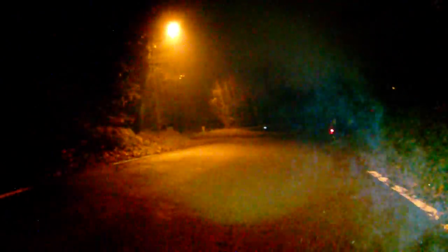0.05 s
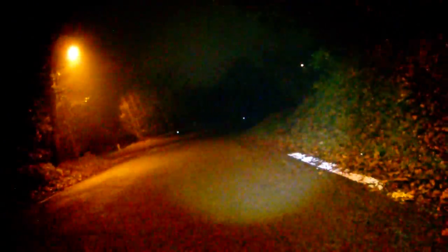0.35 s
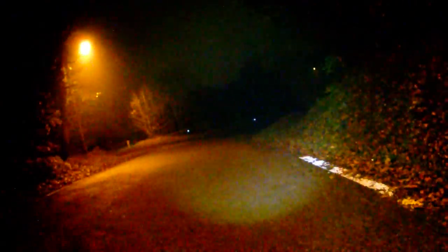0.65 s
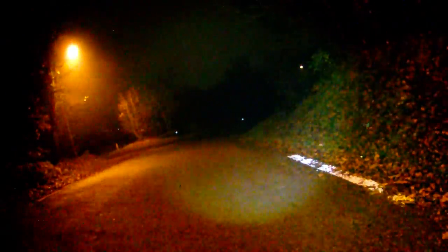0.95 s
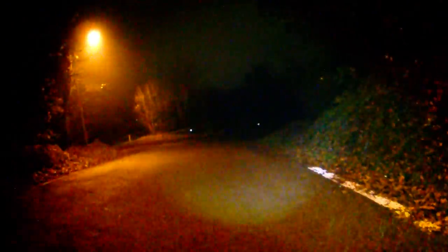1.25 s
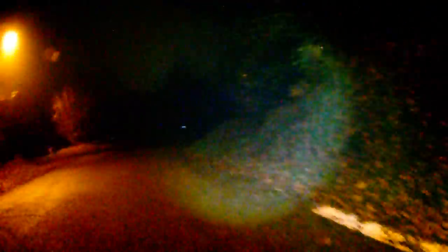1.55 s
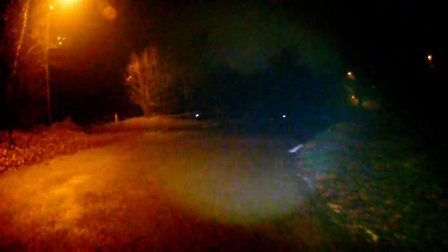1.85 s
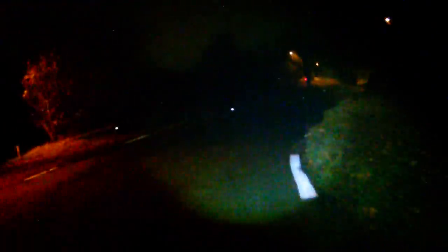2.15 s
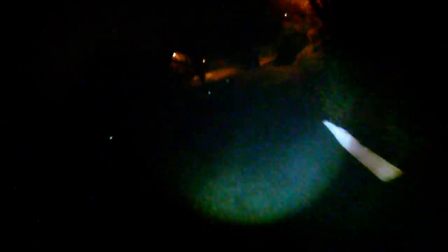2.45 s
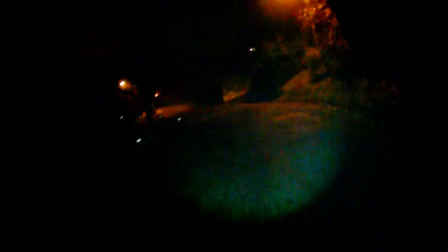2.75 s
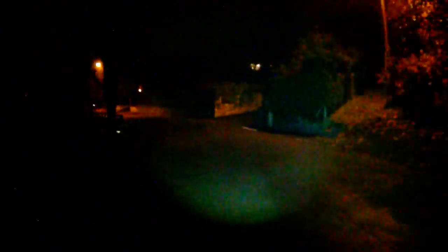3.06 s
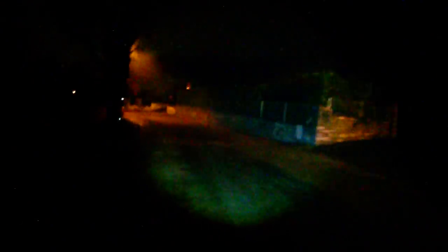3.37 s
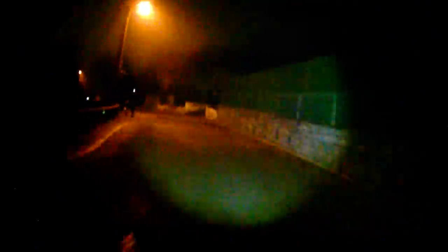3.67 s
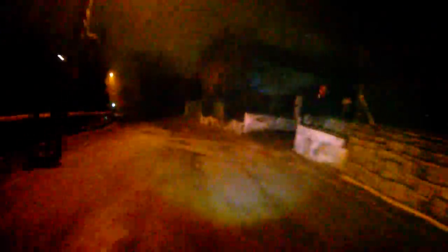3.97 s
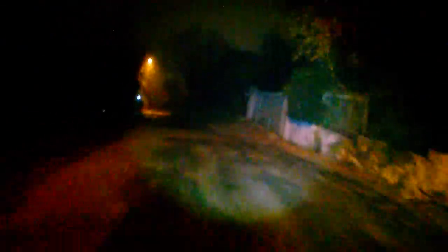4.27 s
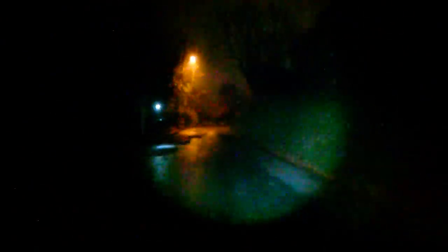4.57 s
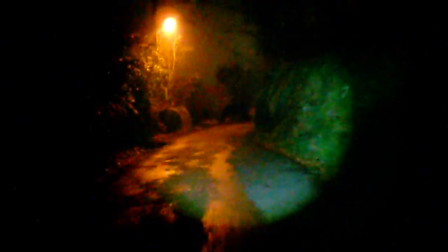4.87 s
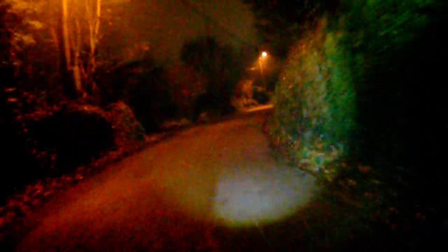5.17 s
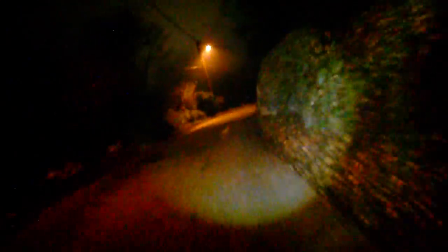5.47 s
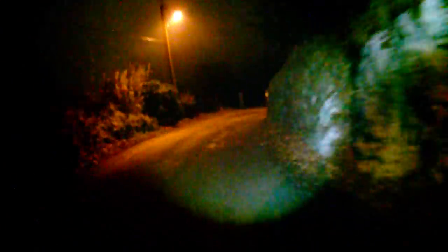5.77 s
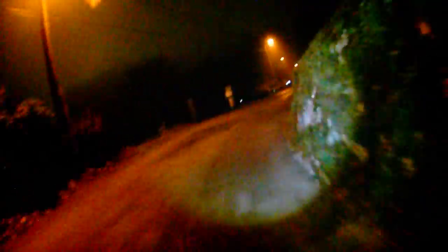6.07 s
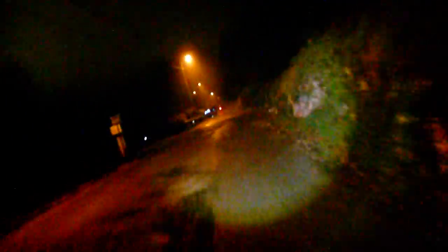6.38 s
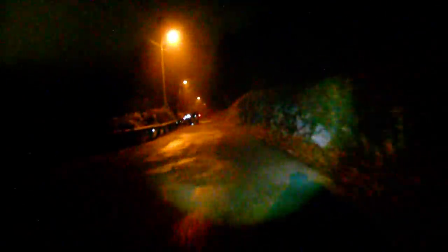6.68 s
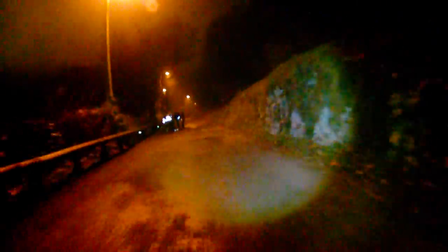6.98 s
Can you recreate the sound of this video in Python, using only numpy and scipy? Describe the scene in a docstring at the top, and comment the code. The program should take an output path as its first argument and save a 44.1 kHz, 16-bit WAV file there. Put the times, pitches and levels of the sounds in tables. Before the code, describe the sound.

On a quiet road, a bicycle's pedals and fittings click and creak, and a shoe snaps into its pedal. The tyres begin to hiss and hum, spitting grit as speed grows, and bumps rattle the loose metal parts. Just past halfway the brake gives two short, loud, high squeals, then rubs faintly as the bike rolls on with a few knocks. The microphone rides on the bike and overloads slightly.

```python
"""On a road at night, a bicycle sets off, heard from a small camera riding with it.
Pedals and fittings click and creak, and a shoe snaps into its pedal. Then the tyres hiss, hum
and spit grit as speed grows, and bumps rattle the loose parts. A brake pad sticks and slips,
squealing twice and overloading the microphone, then rubs on faintly."""
import sys
import numpy as np
from scipy import signal
from scipy.fft import rfft, irfft, next_fast_len
from scipy.io import wavfile
from scipy.ndimage import map_coordinates

SR = 44100
rng = np.random.default_rng(int(sys.argv[2]) if len(sys.argv) > 2 else 0)


def put_to_file(sound):
    """Save the sound as 16-bit audio at rate SR, in the file named by the first command-line argument."""
    columns = np.atleast_2d(sound).T  # one column per channel
    safe = np.clip(columns, -1, 1)
    whole_steps = np.round(safe * 32767)
    wavfile.write(sys.argv[1], SR, whole_steps.astype(np.int16))


N = 310023
T = np.arange(N) / SR
SETS_OFF_S, SET_OFF_TAKES_S = 1.245, 0.17
TOP_HZ = 16000
# the tone of the bike's metal when tapped: pitch_hz, level_db
METAL_TONE = [(100, -25), (750, -3), (1050, 0), (1600, -3.5), (2000, -3.5), (2750, -7), (3300, -2),
              (3900, -1), (4700, 1), (5900, -11), (8000, -1.5), (10700, 6.5), (12500, -13), (16000, -38)]


def undb(db):
    """Turn decibels into a number to multiply by."""
    return 10 ** (np.asarray(db) / 20)


def unit(x):
    """Scale a signal to an average (rms) size of 1."""
    return x / np.sqrt(np.mean(x ** 2) + 1e-18)


def curve(table):
    """Join (time_s, value) points with straight lines."""
    times, values = np.transpose(table)
    return np.interp(T, times, values)


def ramp(start_s, length_s):
    """Rise steadily from 0 to 1, then stay there."""
    return np.clip((T - start_s) / length_s, 0, 1)


def swell(middle_s, length_s):
    """Rise smoothly to 1 and fall back to 0."""
    return np.sin(np.pi * ramp(middle_s - length_s / 2, length_s))


def fade(t, decay_s):
    """Die away, dropping 60 dB in decay_s."""
    return np.exp(-np.log(1000) * t / decay_s)


def add(out, start_s, x):
    """Mix x into out at start_s."""
    i = max(int(start_s * SR), 0)
    out[i:i + len(x)] += x[:max(N - i, 0)]


def colour(x, tone, centre_hz=1000, focus_db=0):
    """Filter by (pitch_hz, level_db) points, less focus_db per octave from the centre, for 2 octaves."""
    size = 2 * next_fast_len(len(x) // 2 + 1024)
    octave = np.log2(np.maximum(np.arange(size // 2 + 1) * SR / size, 1))
    hz, db = np.transpose(tone)
    away = np.minimum(np.abs(octave - np.log2(centre_hz)), 2)
    gain = undb(np.interp(octave, np.log2(hz), db) - focus_db * away)
    # fold the filter in time so that it rings only after a hit, never before
    cepstrum = irfft(np.log(gain))
    cepstrum[1:size // 2] *= 2
    cepstrum[size // 2 + 1:] = 0
    return irfft(rfft(x, size) * np.exp(rfft(cepstrum)))[:len(x)]


def noise(tone, centre_hz=1000, focus_db=0):
    """Steady noise with the given tone."""
    return unit(colour(rng.standard_normal(N), tone, centre_hz, focus_db))


def wobble(rate):
    """A smooth random wobble that changes about rate times a second."""
    knots = rng.standard_normal(N // 8)[:int(N / SR * rate) + 4]
    return unit(map_coordinates(knots, [T * rate], order=3, mode="nearest"))


def whine(hz, width_hz):
    """A narrow band of noise around a pitch that may move."""
    phase = 2 * np.pi * np.cumsum(hz) / SR
    return unit(wobble(width_hz) * np.cos(phase) + wobble(width_hz) * np.sin(phase))


def grains(rate, spread_db):
    """Tiny hits of very uneven size, about rate a second, each smeared over a moment."""
    hit = rng.random(N) < rate / SR
    size = undb(spread_db * np.minimum(rng.exponential(size=N), 3.5))
    smear = signal.lfilter([1], [1, -np.exp(-1 / (SR * 0.00037))], hit * size ** 2)
    return unit(np.sqrt(smear) * rng.standard_normal(N))


def still_air():
    """A faint hiss that eases before the bike sets off."""
    # how loud the hiss is: time_s, level_db
    loudness = [(.2, -47), (.6, -50), (.8, -58), (1.3, -55)]
    # the tone of still air: pitch_hz, level_db
    air_tone = [(30, -25), (120, -26), (250, -12), (400, -29), (700, -26), (1040, 2.5), (1500, -19),
                (1960, -4), (2750, -10), (4600, 2), (5900, -17), (11000, -3.5), (13000, -39), (16000, -81)]
    return undb(curve(loudness)) * noise(air_tone)


def chatter(hiss_db, rough_db):
    """Small loose parts chatter as the bike rolls, most where the road is rough."""
    ticks = unit(colour(grains(rate=80, spread_db=3.2), METAL_TONE, centre_hz=4700, focus_db=10))
    return undb(hiss_db + rough_db - 10) * ramp(SETS_OFF_S, SET_OFF_TAKES_S) * ticks


def creaks():
    """Parts under load slip in uneven steps, from ticking to a thin squeak; faint ticks fill the gaps."""
    # runs of slips: start_s, length_s, first_rate_hz, last_rate_hz, centre_hz, relative_db
    slip_runs = [(0.029, 0.015, 193, 294, 6500, -25.5), (0.046, 0.02, 427, 490, 4700, -18),
                 (0.318, 0.03, 3540, 4200, 6800, -22), (0.333, 0.068, 3150, 3900, 6200, -26),
                 (0.379, 0.034, 755, 1170, 2820, -16.5), (0.374, 0.056, 260, 180, 6560, -26),
                 (0.482, 0.0163, 319, 275, 5140, -19), (0.489, 0.034, 700, 890, 3420, -31),
                 (0.559, 0.057, 262, 230, 6960, -32), (0.992, 0.039, 1055, 940, 3300, -35),
                 (1.11, 0.031, 3030, 3720, 5900, -18.5)]
    out = np.zeros(N)
    for start_s, length_s, first_hz, last_hz, centre_hz, db in slip_runs:
        count = int(length_s * SR)
        rate = np.linspace(first_hz, last_hz, count) * (1 + .025 * wobble(300)[:count])
        late_s = 1e-5 * wobble(2500)[:count]  # each slip comes a little early or late
        phase = 2 * np.pi * (np.cumsum(rate) / SR - rate * late_s)
        slips = unit(sum(np.cos(k * phase) for k in range(1, int(TOP_HZ / rate.max()) + 1)))
        scuff = undb(-18) * rng.standard_normal(count)
        pressure = (.15 + np.hanning(count)) * undb(3 * wobble(300)[:count])
        rubbing = np.pad((slips + scuff) * pressure, (0, count))
        rasp = colour(rubbing, METAL_TONE, centre_hz, focus_db=30.5)
        add(out, start_s, undb(db - 11) * unit(rasp))
    ticks = unit(colour(grains(rate=190, spread_db=3.8), METAL_TONE, centre_hz=4300, focus_db=10))
    return out + undb(-47) * ticks


def tyre_hiss(hiss_db, pace_db, rough_db):
    """The tread hisses on the asphalt and flings a bright spray of grit."""
    # the tone of the tread on asphalt: pitch_hz, level_db
    hiss_tone = [(1180, -43), (2000, -6), (2340, -6), (2890, 2), (3240, 1.5), (3690, -1.5), (4140, 6),
                 (4580, 1), (5680, -8.5), (7000, -12), (9100, -31), (15400, -120)]
    # the tone of flying grit: pitch_hz, level_db
    spray_tone = [(4000, -20.5), (5600, 0), (6500, 5.5), (7500, 5.5), (8500, 3.5), (10700, 8), (11400, 1.5),
                  (12500, -11.5), (14000, -21), (15000, -65)]
    road_db = 1.18 * wobble(45) - .3  # the surface changes under the wheel
    grit = grains(rate=140, spread_db=3.5)
    hiss = undb(0.75) * noise(hiss_tone) + undb(-7.5) * unit(colour(grit, hiss_tone))
    spray_db = -26 + pace_db + rough_db + 0.37 * wobble(60)
    spray = undb(-1.5) * noise(spray_tone) + undb(-5.5) * unit(colour(grit, spray_tone))
    return undb(hiss_db + road_db) * hiss + undb(spray_db + road_db) * spray


def wheel_roar(hiss_db, pace_db):
    """Rolling makes the tyres roar and the wheels ring."""
    # the tone of the tyres' roar: pitch_hz, level_db
    roar_tone = [(200, -35), (450, -19.5), (680, -12), (850, 1), (1020, 6.5), (1300, 2.5), (1550, 3.5),
                 (3000, -40)]
    # the ring of a rolling wheel: pitch_hz, level_db
    rim_tone = [(1400, -30.5), (1630, -2), (1740, 11.5), (1840, 6), (1950, 10.5), (2100, 1), (2500, -36.5)]
    thin_db = np.minimum(hiss_db + 37.5, 0)  # at a crawl both fall away faster
    damped_db = -2 * ramp(4.1, 0.14)  # the brake pad damps the ring
    roar = undb(-33 + 0.47 * pace_db + thin_db + 0.13 * wobble(25)) * noise(roar_tone)
    rim = undb(-31 + 0.67 * pace_db + 2 * thin_db + damped_db + 0.39 * wobble(17)) * noise(rim_tone)
    return roar + rim


def frame_hum(hiss_db, pace_db):
    """The tyres hum through the frame, higher when the bike is slow."""
    # the tone of the humming frame: pitch_hz, level_db
    hum_tone = [(25, -26), (60, -21), (115, 4), (170, 0.5), (260, -7.5), (450, -8.5), (900, -38)]
    slow = np.clip((-24.5 - hiss_db) / 8, 0, 1)
    slow_hum = noise(hum_tone, centre_hz=238, focus_db=11.5)
    hum_db = -51.5 + 0.22 * pace_db + 0.53 * wobble(11)
    return undb(hum_db) * (np.sqrt(1 - slow) * noise(hum_tone) + np.sqrt(slow) * slow_hum)


def tyres(hiss_db, rough_db):
    """The rolling tyres hiss, roar and hum, and their tread whines higher as speed grows."""
    pace_db = hiss_db + 20  # 0 at cruising speed
    rolling = tyre_hiss(hiss_db, pace_db, rough_db)
    rolling += wheel_roar(hiss_db, pace_db) + frame_hum(hiss_db, pace_db)
    tread_db = np.minimum(-43 + 1.35 * pace_db, -43.5)
    tread = undb(tread_db) * whine(hz=900 * 2 ** (pace_db / 23), width_hz=55)
    return ramp(SETS_OFF_S, SET_OFF_TAKES_S) * (rolling + tread)


def tap(chance, centre_hz, decay_s, focus_db, ring_db, rise_s):
    """One contact: a short crack and faint tail shaped from the noise in chance, and the frame's ring."""
    # the notes of the metal frame: pitch_hz, level_db, decay_s
    frame_notes = [(1960, -6, 0.44), (2080, -8, 0.33), (2440, -11, 0.45), (3650, -45, 0.24),
                   (4040, -4, 0.27), (4930, -2, 0.15), (7900, -6, .3)]
    t = T[:len(chance)]
    push = (1 - np.exp(-t / rise_s)) * fade(t, decay_s)
    tail = undb(-32) * fade(t, 0.19)
    crack = colour(chance * (push / push.max() + tail), METAL_TONE, centre_hz, focus_db)
    ring = sum(undb(db) * fade(t, ring_s) * np.cos(2 * np.pi * hz * t) for hz, db, ring_s in frame_notes)
    return crack / np.abs(crack).max() + undb(ring_db) * ring


def ping(centre_hz, chance, decay_s):
    """A small part rings briefly at its own pitch and at a few random others, mostly lower."""
    t = T[:SR // 3]
    other_hz = 2 ** np.interp(chance, [-2, 0, 2], np.log2([1950, .8 * centre_hz, 10000]))
    ring = np.cos(2 * np.pi * centre_hz * t) + undb(-9) * sum(np.cos(2 * np.pi * hz * t) for hz in other_hz)
    return ring * fade(t, decay_s) * np.minimum(t / .0007, 1)


def clicks():
    """Pedals and fittings click: each part strikes, rings and bounces once."""
    # small parts striking: start_s, relative_db, centre_hz
    strikes = [(0.0179, -22, 6800), (0.0494, -15, 4540), (0.117, -19.5, 4170), (0.1445, -12, 4350),
               (0.21, -21, 3180), (0.301, -18, 4100), (0.312, -12.5, 6600), (0.4673, -1, 5580),
               (0.4767, -5, 5030), (0.5318, -11.5, 4170), (0.583, -18, 4720), (0.63, -14.5, 4940),
               (0.6607, -14, 5300), (0.695, -29, 4100), (0.7596, -11, 4760), (0.7887, -15, 5200),
               (0.807, -14, 4370), (0.8888, -21, 4300), (0.9023, -12.5, 4650), (0.973, -16, 4760),
               (1.032, -14, 4640), (1.1016, -8.5, 6640), (1.3515, -17.5, 8600), (1.4674, -15.5, 4100),
               (1.5865, -16.5, 4130), (1.6162, -12, 7200), (1.6765, -4.5, 4060)]
    out = np.zeros(N)
    for start_s, db, hz in strikes:
        first, second = rng.standard_normal((2, SR // 3))
        crack, bounce = (tap(chance, hz, decay_s=0.01, focus_db=11, ring_db=-42, rise_s=0.0002)
                         for chance in (first, second))
        note = undb(-6) * ping(hz, first[:4], decay_s=0.029)
        add(out, start_s, undb(db - 3.5) * (crack + note))
        gap_s = .005 * 2 ** (.5 * second[0])
        add(out, start_s + gap_s, undb(db - 9) * bounce)
    return out


def rattles_and_knocks():
    """A loose part grazes its stop just before it strikes home and rings the frame."""
    # rattles over bumps: start_s, relative_db, centre_hz, focus_db
    rattles = [(2.172, -15, 6900, 32), (2.3394, -12, 4150, 5), (2.618, -6, 4230, 8), (2.807, -11, 4100, 5),
               (3.2074, -1.5, 4140, 8), (3.2838, -2.5, 3130, 9), (3.6248, -6, 3830, 5),
               (3.6508, 0, 3730, 5), (3.8207, 0, 4300, 15.5), (3.8684, 1.5, 4340, 14), (3.914, 0, 4230, 12),
               (3.962, -10, 2890, 11), (4.057, -2, 4130, 8), (4.1029, -1, 4580, 10), (4.184, -2, 4000, 8),
               (4.1992, 8.5, 3160, 7.5), (4.2304, -4, 2820, 17), (4.2436, 3.5, 5070, 6.5),
               (4.2587, 7, 4220, 8), (4.2902, 4.5, 3970, 8), (4.55, 3.5, 2860, 3.5), (4.7069, 1, 2860, 1),
               (4.7522, -1, 4150, 13), (5.3115, -4, 2860, 8), (5.3882, -1, 3000, 4),
               (6.2171, -8.5, 2870, 2)]
    # heavy knocks: start_s, relative_db, centre_hz, decay_s, focus_db
    knocks = [(1.1457, 0.5, 3000, 0.011, 5.5), (4.512, 3.5, 3120, .061, 5), (4.518, 5, 3030, 0.047, 11.5),
              (5.978, 1, 4500, 0.025, 5.5), (5.982, -6.5, 3530, 0.08, 1), (6.17, 3, 3330, 0.026, 6.5),
              (6.298, 1.5, 3320, 0.032, 6.5)]
    rattle_decay_s, hard_rise_s, soft_rise_s = .012, .0012, .002
    blows = [(s, db + 1, hz, rattle_decay_s, focus_db, hard_rise_s) for s, db, hz, focus_db in rattles]
    blows += [(*knock, soft_rise_s) for knock in knocks]
    out = np.zeros(N)
    for start_s, db, hz, decay_s, focus_db, rise_s in blows:
        graze, blow = (tap(chance, hz, decay_s, focus_db, ring_db=-37, rise_s=rise_s)
                       for chance in rng.standard_normal((2, SR // 3)))
        add(out, start_s - .004, undb(db - 14) * graze)
        add(out, start_s, undb(db) * blow)
    return out


def brake_rub():
    """The pad brushes the rim with a faint whine."""
    # touches of the pad: middle_s, length_s, pitch_hz, level_db
    rubs = [(4.856, 0.63, 2674, -27.5), (5.318, .08, 2730, -23), (5.594, 1, 2637, -32.5),
            (6.73, 1, 2637, -27.5)]
    return sum(undb(db) * swell(middle_s, length_s) * whine(np.full(N, hz), width_hz=190)
               for middle_s, length_s, hz, db in rubs)


def brake_squeal():
    """The pad sticks and slips at one pitch; every other cycle differs, adding tones at half steps of it."""
    # the path of the pitch, one list per squeal: time_s, pitch_hz
    squeals = [
        [(3.931, 2734), (3.96, 2970), (3.978, 2883), (4.0, 2859), (4.02, 2885), (4.033, 2986), (4.05, 2830)],
        [(4.566, 2647), (4.597, 2872), (4.612, 2804), (4.678, 2806), (4.702, 2895), (4.722, 2806)],
    ]
    # the pad catches, so the squeal sags and loses overtones: middle_s, length_s
    catches = [(3.952, .009), (4.589, .012), (4.639, .014)]
    # the squeal's other tones: multiple_of_pitch, relative_db
    partials = [(.5, -23), (1.5, -4.5), (2, 2.5), (2.5, -3.5), (3.5, -5), (4, -9), (4.5, -10), (5.5, -22)]
    growth_db_per_s, release_s = 600, 0.015
    scrape = unit(colour(grains(rate=900, spread_db=3), METAL_TONE))  # grit under the pad
    caught = sum(swell(middle_s, length_s) for middle_s, length_s in catches)
    out = np.zeros(N)
    for path in squeals:
        hz = curve(path) * (1 - .035 * caught)
        start_s, end_s = path[0][0], path[-1][0]
        # the vibration feeds itself up to a ceiling, overtones first, and dies as the pad lets go
        growth_db = np.minimum(-16 + growth_db_per_s * np.maximum(T - start_s, 0), 0)
        sounding = (T > start_s) * (1 - ramp(end_s - release_s, release_s) ** 2)
        main_db = 1 + growth_db - 6 * caught + 1.04 * wobble(110)
        phase = 2 * np.pi * np.cumsum(hz * (1 + .0016 * wobble(400))) / SR
        overtones = sum(undb(db + 2.2 * wobble(60)) * np.cos(k * phase) for k, db in partials)
        overtones_db = -11 + 0.12 * growth_db - 12 * caught
        squeal = undb(main_db) * np.sin(phase) - undb(overtones_db) * overtones
        out += sounding * (squeal + undb(-16.5 + growth_db / 2) * scrape)
    return out


def scene():
    """The whole bicycle over a faint hiss, in one channel."""
    # how hard the tyres roll, given as their hiss: time_s, level_db
    rolling_hiss = [(1.28, -49), (1.43, -42.5), (1.8, -40.9), (2.0, -35.5), (2.25, -33.0), (2.5, -26),
                    (2.97, -24.5), (3.68, -17.5), (3.95, -19.5), (4.27, -17), (4.42, -20), (4.8, -20.5),
                    (5.0, -21.5), (5.22, -26), (5.47, -19.0), (6.08, -22.5), (6.7, -24), (7.0, -20.5)]
    # rough stretches of road: middle_s, length_s, extra_grit_db
    rough_road = [(2.847, 0.099, 5), (3.65, 0.29, 4.5), (3.803, .1, 2), (4.236, 0.31, 4), (4.928, 1, 5),
                  (5.7, 0.99, 2.5)]
    hiss_db = curve(rolling_hiss)
    rough_db = sum(db * swell(middle_s, length_s) for middle_s, length_s, db in rough_road)
    rolling = tyres(hiss_db, rough_db) + chatter(hiss_db, rough_db)
    fittings = clicks() + rattles_and_knocks() + creaks()
    brake = brake_rub() + brake_squeal()
    return (still_air() + rolling + fittings + brake)[None]


def record(dry):
    """The microphone squashes peaks lopsidedly, so overloads add a low thump; the top treble is cut."""
    ceiling = np.where(dry > 0, .76, .87)
    knee = 4  # higher bends the peaks more sharply
    squashed = dry / (1 + np.abs(dry / ceiling) ** knee) ** (1 / knee)
    return signal.sosfiltfilt(signal.butter(12, TOP_HZ, fs=SR, output="sos"), squashed)


dry = scene()
out = record(dry)
put_to_file(out)
```